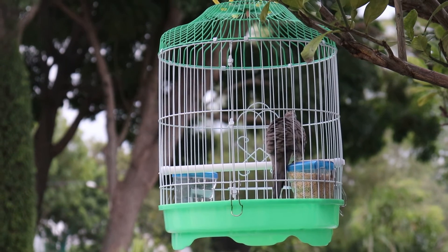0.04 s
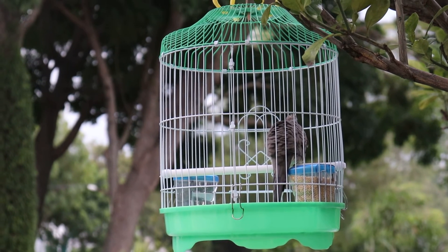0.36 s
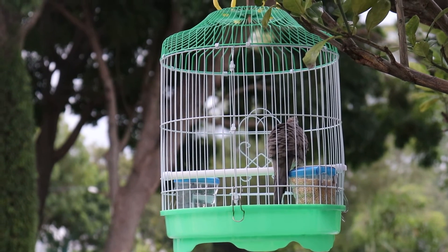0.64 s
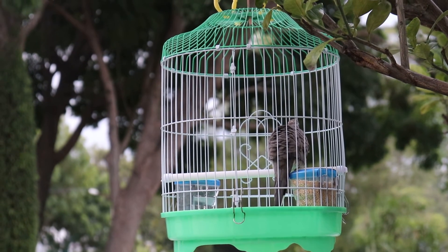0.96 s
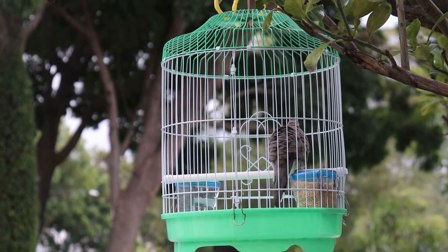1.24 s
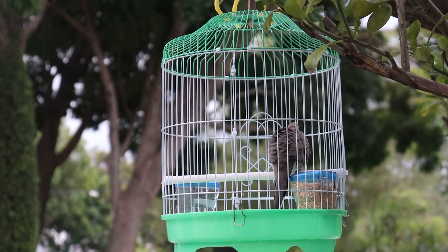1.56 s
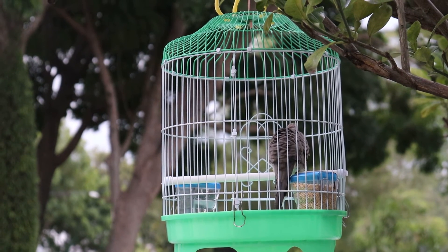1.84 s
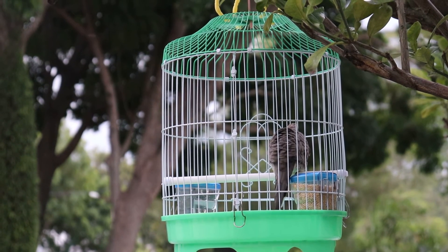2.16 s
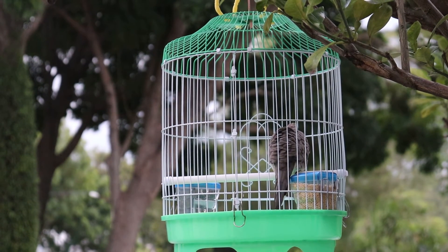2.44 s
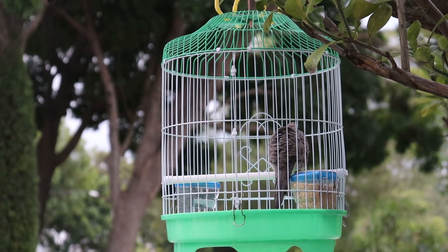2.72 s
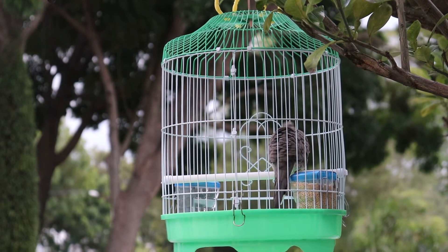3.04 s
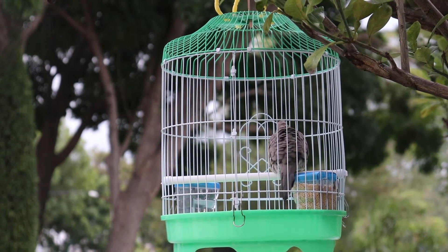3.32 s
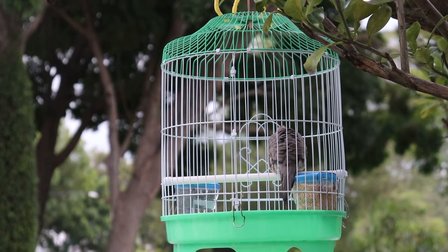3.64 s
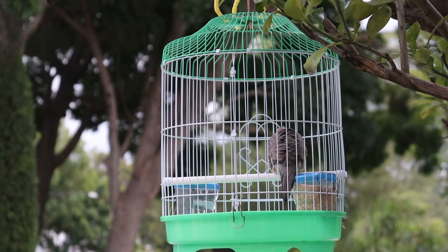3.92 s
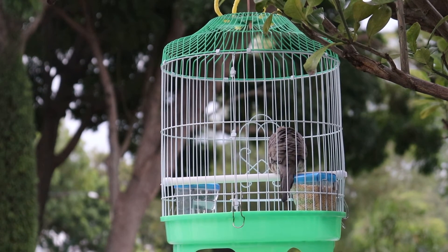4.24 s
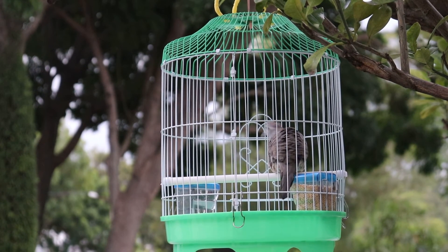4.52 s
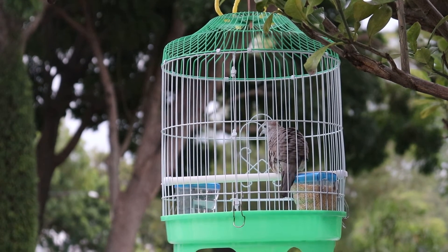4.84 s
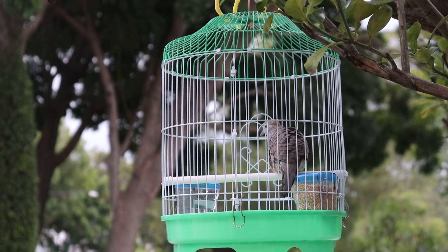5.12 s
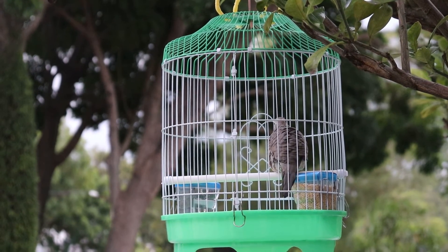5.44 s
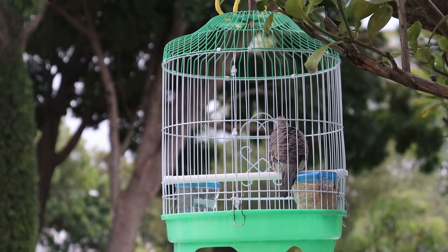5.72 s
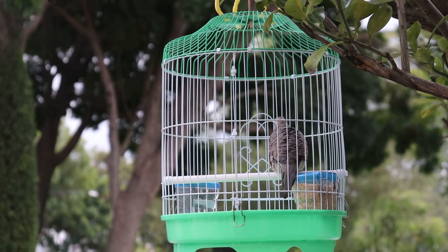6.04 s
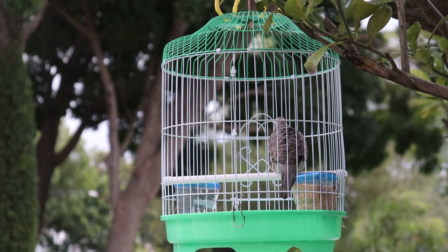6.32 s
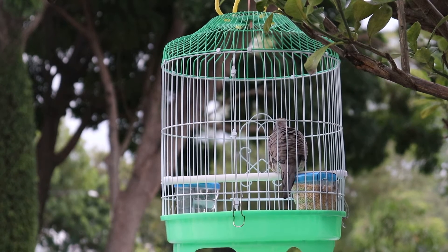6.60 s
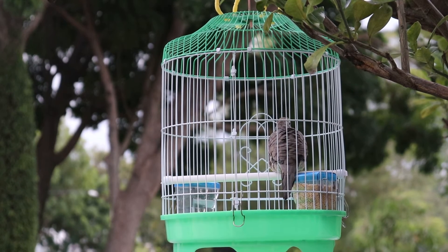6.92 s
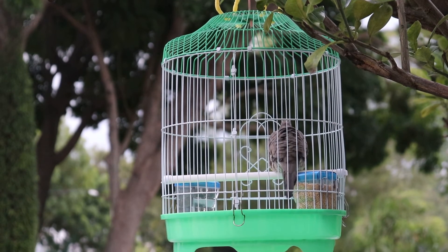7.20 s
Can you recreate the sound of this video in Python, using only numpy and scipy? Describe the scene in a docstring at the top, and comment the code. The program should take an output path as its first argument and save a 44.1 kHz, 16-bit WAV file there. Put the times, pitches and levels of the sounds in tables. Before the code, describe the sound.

A caged dove sings close to the microphone in a garden, slightly right of centre. From the start to about 2.3 seconds it gives clear staccato coos, each opened by a tiny throat catch, quickest and loudest around 1.6 seconds. A shorter run follows from 3.5 to 4.3 seconds, and a single coo at 7.3. A second dove, just left of centre, answers at about 0.5, 3.2 and 6 seconds, each time with two hoots and a rolling growl that falls away. Both echo lightly off walls and trees. Something bangs shut dully in the distance at 2.2 seconds. Far left, a bird gives raspy calls from 3.2 seconds, ending in a clean rising whistle around 4.4. Faint high coos come from further off near 0.9, 3.4 and 6.1 seconds. A low town rumble, soft airy hiss and faint machine hum continue throughout.

```python
"""A caged dove, close to a stereo pair in a garden, sings clear staccato coos, each opened by a catch
of the throat. A second dove, a little left of centre, answers with two hoots and a rolling growl.
Nearby walls echo both; trunks and leaves scatter the sound. Further off are faint high coos, and far
to the left a bird calls and whistles among the trees. Something bangs shut in the distance, and a
machine hums under the town's rumble."""
import sys
import numpy as np
from scipy import signal
from scipy.fft import irfft
from scipy.io import wavfile
from scipy.ndimage import uniform_filter1d

SR = 44100
rng = np.random.default_rng(int(sys.argv[2]) if len(sys.argv) > 2 else 0)


def to_wav(s):
    """Save 16-bit WAV."""
    ch = np.atleast_2d(s).T  # columns
    pcm = np.round(np.clip(ch, -1, 1) * 32767)  # PCM
    wavfile.write(sys.argv[1], SR, pcm.astype(np.int16))


N = 324576

# how alike diffuse sound is at the two microphones: f/Hz, coherence 0-1
MIC_COHERENCE = [(100, .99), (250, 0.95), (500, 0.71), (1000, 0.39), (2000, .2), (4000, 0.068),
                 (12000, 0.081)]
# the second dove's phrases: t/s, top pitch of the hoots/Hz, hoot level/dB, growl level/dB
ANSWERS = [(.45, 729.4, -24.5, -23), (3.193, 780.7, -21.5, -23.5), (6.013, 789.2, -21, -23.5)]
# the caged dove's notes, and a faint echo of one at 2.3 s:
# t/s, length/s, top pitch/Hz, level/dB, level of the opening catch/dB
COOS = [ (-.055, 0.217, 914.3, -20.5, -30), (0.276, 0.229, 904, -22, -35), (.618, 0.218, 896.5, -21.5, -35),
        (.972, 0.19, 885, -21.5, -27.5), (1.521, 0.12, 941, -16, -30), (1.632, 0.054, 941.6, -13.5, -40),
        (1.728, 0.045, 936, -18, -37), (1.846, .19, 898, -20.5, -33), (2.163, .148, 870, -30, -31),
        (2.3, 0.077, 875, -34.5, -55), (3.55, 0.15, 938, -13.5, -29), (3.716, 0.033, 938.5, -13, -45),
        (3.803, 0.039, 913, -18.5, -37), (3.902, 0.15, 895, -18.5, -41.5), (4.199, 0.11, 872, -28.5, -32),
        (7.346, .2, 865, -21, -28.5), ]


def gain_of(db):
    """Decibels to a factor."""
    return 10 ** (np.asarray(db) / 20)


def unit_rms(x):
    """Scales to an rms of 1."""
    return x / np.sqrt(np.mean(x ** 2) + 1e-20)


def value_at(points, hz):
    """Interpolates a table on a log-frequency axis."""
    f, value = np.transpose(points)
    return np.interp(np.log(hz + 1), np.log(f + 1), value)


def curves(rows):
    """Sample times of a table, then each column joined by straight lines."""
    s, *columns = np.transpose(rows)
    t = np.arange(s[0], s[-1], 1 / SR)
    return [t] + [np.interp(t, s, c) for c in columns]


def add(mix, s, sound):
    """Lays a sound into the mix at time s, which may lie before the start."""
    at = round(s * SR)
    part, sound = mix[max(at, 0):], sound[max(-at, 0):]
    part[:len(sound)] += sound[:len(part)]


def wander(size, hz):
    """Smooth random drift, rms about 1, that moves up to about hz times a second."""
    f = np.fft.rfftfreq(2 ** 19 if size > SR else 2 ** 16, 1 / SR)
    spectrum = rng.standard_normal(len(f)) + 1j * rng.standard_normal(len(f))
    return unit_rms(irfft(spectrum * np.exp(-(f / hz) ** 2)))[:size]


def fade(t, seconds):
    """Soft start and end of a note."""
    return np.sin(np.pi / 2 * np.clip(np.minimum(t - t[0], t[-1] - t) / seconds, 0, 1)) ** 2


def swell(t, attack_s, release_s):
    """Attack, hold and release; a short note peaks where the two ramps meet."""
    ramps = np.clip(np.minimum(t / attack_s, (t[-1] - t) / release_s), 0, 1)
    return np.sin(np.pi / 2 * ramps / ramps.max())


def tone(hz, harmonics=((1, 0),)):
    """Harmonics (multiple, level/dB) on a moving pitch; a pure tone by default."""
    phase = 2 * np.pi * np.cumsum(hz) / SR
    return np.sqrt(2) * sum(gain_of(db) * np.sin(multiple * phase) for multiple, db in harmonics)


def pan(x, left_db):
    """Makes the left channel left_db louder than the right."""
    return x * gain_of(np.array([[left_db], [-left_db]]) / 2)


def late_right(x, lag_s):
    """Sound from the left reaches the right microphone later."""
    t = np.arange(N) / SR
    return np.array([x[0], np.interp(t - lag_s, t, x[1])])


def diffuse_noise(colour, patchy_db):
    """Coloured noise of rms 1 that swells in patches; the bass is alike at both microphones."""
    frames, hz = N // 512 + 5, np.fft.rfftfreq(2048, 1 / SR)
    a, b, c, d, patches = rng.standard_normal((5, frames, len(hz)))
    patches = uniform_filter1d(patches, size=16, axis=0)
    patches = unit_rms(uniform_filter1d(patches, size=30, axis=1))
    coherence, left = value_at(MIC_COHERENCE, hz), a + 1j * b
    right = coherence * left + np.sqrt(1 - coherence ** 2) * (c + 1j * d)
    bands = np.array([left, right]) * gain_of(value_at(colour, hz) + patchy_db * patches)
    return unit_rms(signal.istft(bands.swapaxes(1, 2), nperseg=2048, noverlap=1536)[1][:, :N])


def garden(x):
    """Diffuse scatter from trunks and leaves, each band dying at its own speed."""
    # reverberation time: f/Hz, t60/s
    decay_times = [(100, 0.2), (800, 0.58), (2500, 1.5), (5000, 1.09), (10000, 0.88), (15000, .5)]
    hz, t, bands = signal.stft(rng.standard_normal((2, SR)), SR, nperseg=256)
    coherence = value_at(MIC_COHERENCE, hz)[:, None]
    bands[1] = coherence * bands[0] + np.sqrt(1 - coherence ** 2) * bands[1]
    decay = gain_of(-60 * t / value_at(decay_times, hz)[:, None])
    tail = signal.istft(bands * decay, SR, nperseg=256)[1]
    return signal.fftconvolve(x[None], tail / np.linalg.norm(tail[0]), axes=1)[:, :N]


def walls(x, echoes):
    """The direct sound with single echoes from the ground and nearby walls."""
    out = np.array([x, x])
    for left_s, right_s, db in echoes:
        add(out[0], left_s, gain_of(db) * x)
        add(out[1], right_s, gain_of(db) * x)
    return out


def microphone_hiss():
    """The microphones' own thin hiss."""
    # two high bands of hiss: f/Hz, level/dB
    hiss = [(6400, -20), (7150, -6), (7550, -1), (8200, -14), (8700, -9.5), (9300, 1), (9900, -10.5),
            (11000, -32)]
    return gain_of(-57.5) * diffuse_noise(hiss, patchy_db=2.3)


def town_ambience():
    """Town rumble and open air."""
    # spectrum of the town's rumble: f/Hz, level/dB
    rumble = [(15, -36), (25, -16), (45, -5.5), (75, 2.5), (115, 0), (150, -2.5), (190, -3.5), (240, -9),
              (330, -10), (520, -16), (900, -46.5)]
    # spectrum of the open air: f/Hz, level/dB
    air = [(300, -8), (600, 0), (1000, 0), (1300, 0), (1700, -3.5), (2300, -7), (2900, -5), (4000, -7),
           (4800, -12.5), (5700, -19), (8400, -22), (10500, -21.5), (12000, -29), (15500, -35.5)]
    return (gain_of(-43.5) * diffuse_noise(rumble, patchy_db=0.4)
            + gain_of(-45) * diffuse_noise(air, patchy_db=0.84))


def machine(drift=0.00401, throb=0.089):
    """A far motor: steady tones that waver in pitch and strength."""
    # tones of the hum: f/Hz, level/dB
    hum = [(188.4, -46.5), (969.0, -63), (1260, -60.5), (1480, -64), (1825, -77.5), (2912, -64.5)]
    out = np.zeros(N)
    for hz, db in hum:
        strength = 1 + throb * wander(N, 13)
        out += gain_of(db) * strength * tone(hz * (1 + drift * wander(N, 5.3)))
    return out


def bang(ring_s=0.051, tail_s=0.13, tail_db=-12):
    """Something shuts far off: a dull blow with a sharp edge, two rebounds and a short tail."""
    # the blow and its rebounds: t/s, level/dB
    blows = [(2.233, -30.5), (2.26, -37), (2.279, -39)]
    # spectrum of the bang: f/Hz, level/dB
    colour = [(25, -9), (55, 0), (170, -1), (250, -7), (335, -2), (450, -17), (1500, -24), (3200, -19),
              (5500, -25), (9000, -39), (15000, -55)]
    power = np.zeros(N)
    t = np.arange(SR) / SR
    decay = np.exp(-2 * t / ring_s) + gain_of(2 * tail_db) * np.exp(-2 * t / tail_s)
    for s, db in blows:
        add(power, s, gain_of(2 * db) * decay * fade(t, 0.0036))
    return np.sqrt(power) * diffuse_noise(colour, patchy_db=1)


def far_coos(sag=0.015):
    """Thin, high coos further off, each sinking a little."""
    # faint coos: t/s, length/s, f/Hz, level/dB
    notes = [(0.878, 0.041, 1075, -29), (3.369, 0.048, 1075, -35.5), (3.421, 0.12, 1055, -46.5),
             (6.139, 0.11, 1078, -42)]
    out = np.zeros(N)
    for s, length, hz, db in notes:
        t = np.arange(0, length, 1 / SR)
        sinking = 1 - sag * (t / length - .5)
        add(out, s, gain_of(db) * fade(t, 0.031) * tone(hz * sinking))
    return out


def far_bird(rasp_hz=260, slur_share=.35):
    """Raspy calls from the trees, then a clean rising whistle; each note slurs and levels off."""
    # calls: t/s, length/s, opening pitch/Hz, final pitch/Hz, level/dB, rasp as a share of the pitch
    calls = [ (0, 0.27, 5210, 5200, -64.5, 0.049), (3.17, 0.084, 3260, 3430, -44, 0.025),
             (3.235, 0.079, 3410, 3492, -38, 0.015), (3.51, .15, 2676, 2920, -47, 0.063),
             (3.595, 0.091, 3490, 3545, -38.5, 0.0076), (4.06, 0.152, 2855, 3000, -51, 0.025),
             (4.185, 0.12, 3070, 3500, -42, .038), (4.22, 0.14, 3109, 3130, -50, 0.0057), ]
    # the whistle's soft lead-in, upward slur and faint end: columns as for the calls
    whistle = [(4.24, .075, 4670, 4700, -49, .002), (4.298, 0.091, 4620, 4990, -35, .003),
               (4.385, 0.108, 5014, 5050, -30, 0.0041), (4.51, 0.118, 4982, 5085, -38, 0.0039)]
    # harmonics of a call: multiple, level/dB
    call_harmonics = [(1, 2.5), (2, -8), (3, -21), (4, -40)]
    # harmonics of the whistle: multiple, level/dB
    whistle_harmonics = [(1, -2), (2, -27.5), (3, -43)]
    out = np.zeros(N)
    for notes, harmonics in (calls, call_harmonics), (whistle, whistle_harmonics):
        for s, length, from_hz, to_hz, db, rasp in notes:
            t = np.arange(0, length, 1 / SR)
            hz = to_hz + (from_hz - to_hz) * np.exp(-t / (slur_share * length))
            hz *= 1 + rasp * wander(len(t), rasp_hz)
            add(out, s, gain_of(db) * swell(t, attack_s=0.011, release_s=0.023) * tone(hz, harmonics))
    return out


def pulsing(size, rate_hz, depth, unevenness):
    """An uneven pulsing: the growl's trill, and the ripple of overlapping echoes on the hoots."""
    beat = 2 * np.pi * np.cumsum(rate_hz * (1 + unevenness * wander(size, 50.2))) / SR
    return np.sin(beat), 1 + depth * np.cos(beat)  # a swing, and a strength that peaks on each upsweep


def hoots(ripple_hz=58, pitch_swing=0.0048, jitter=0.0062):
    """The second dove opens each phrase with two arched hoots; a ripple stands for overlapping echoes."""
    # the quick hoot: t/s into the phrase, factor on the top pitch, level/dB
    quick_hoot = [(0, .74, -10), (0.027, .93, -10), (.037, 0.98, -1.5), (0.058, .99, -3), (0.085, .86, -3),
                  (.1, 0.762, -11.5), (.114, 0.57, -21)]
    # the slow hoot, which swells again as its pitch breaks: same columns
    slow_hoot = [(.155, .66, -14), (.195, .85, -7), (0.23, .97, 3.5), (0.259, 1, -3.5), (0.289, .99, -6),
                 (.303, .92, 1), (.325, 0.693, -14.5)]
    out = np.zeros(N)
    for s, top_hz, level_db, _ in ANSWERS:
        for shape in quick_hoot, slow_hoot:
            t, arch, db = curves(shape)
            swing, strength = pulsing(len(t), ripple_hz, depth=0.51, unevenness=.15)
            hz = top_hz * arch * (1 + pitch_swing * swing + jitter * wander(len(t), 150))
            add(out, s + t[0], gain_of(level_db + db) * fade(t, 0.0019) * strength * tone(hz))
    return out


def growls(trill_hz=59, pitch_swing=0.13, rough=0.022, grain=0.11):
    """The second dove ends each phrase on a fast, wide trill that dies away as the note falls."""
    # course of the growl: t/s into the phrase, f/Hz, level/dB, amount of trill 0-1
    course = [(.475, 795.3, -5, .95), (.59, 823.6, -2.5, 0.8), (.705, 800, -1.5, 1), (.765, 775, 0, 0.69),
              (.825, 703.6, 0, 0.52), (.875, 625, -6.5, .2), (.925, 519, -19, 0)]
    out = np.zeros(N)
    t, course_hz, db, trill = curves(course)
    for s, _, _, level_db in ANSWERS:
        swing, strength = pulsing(len(t), trill_hz, depth=0.15 * trill, unevenness=.27)
        hz = course_hz * (1 + trill * (pitch_swing * swing + rough * wander(len(t), 200)))
        strength *= 1 + grain * trill * wander(len(t), 100)
        add(out, s + t[0], gain_of(level_db + db) * fade(t, .008) * strength * tone(hz))
    return out


def throat_catches(hz=1050, lead_s=0.00384, half_width_s=.0052, glide=.06, rough=.1, shimmer=0.33):
    """The caged dove's throat catches just before each note: a brief, unsteady cluck slipping upward."""
    out = np.zeros(N)
    u = np.arange(-3, 3, 1 / (half_width_s * SR))  # time from the cluck's centre, in half-widths
    for s, _, _, _, db in COOS:
        pitch = hz * np.exp(glide * u + rough * wander(len(u), 300))
        envelope = np.exp(-abs(u) ** 3 / 4) * (1 + shimmer * wander(len(u), 240))
        add(out, s - lead_s + u[0] * half_width_s, gain_of(db) * envelope * tone(pitch))
    return out


def caged_dove(scoop=0.2055, scoop_s=0.00787, jitter=0.0035, sag_db_per_s=12, round_above_db=-21):
    """Close, nearly pure notes that scoop up and arch; the louder the note, the rounder its tone."""
    # harmonics of the dove's voice: multiple, level/dB
    harmonics = [(1, 0), (2, -37), (3, -36), (4, -42), (5, -47), (6, -49), (7, -49), (8, -52)]
    # the arch of every note: share of its length, factor on the top pitch
    pitch_arch = [(0, .97), (.2, .993), (.35, 1), (.65, .985), (1, .968)]
    out = np.zeros(N)
    for s, length, top_hz, level_db, _ in COOS:
        t = np.arange(0, length, 1 / SR)
        db = level_db - sag_db_per_s * t
        arch = np.interp(np.linspace(0, 1, len(t)), *np.transpose(pitch_arch))
        rise = 1 - scoop * np.exp(-t / scoop_s)
        hz = top_hz * arch * rise * (1 + jitter * wander(len(t), 120))
        overtones = tone(hz, harmonics[1:]) * gain_of(-np.maximum(db - round_above_db, 0))
        add(out, s, gain_of(db) * swell(t, attack_s=0.051, release_s=0.022) * (tone(hz) + overtones))
    return out


def scene():
    """The garden from the microphones: the caged dove close and driest, the far bird mostly scatter."""
    # echoes of the caged dove: left delay/s, right delay/s, level/dB
    cage_echoes = [(.0165, 0.015, -20.5), (.043, .0425, -22), (.082, 0.094, -26.5), (.108, 0.15, -26)]
    # echoes of the second dove from walls near it: same columns
    answer_echoes = [(.0140, 0.01145, -7.5), (.02665, .02335, -4.5), (.038, .0415, -17.5),
                     (.05365, .0537, -13.5), (.102, 0.12, -20.5)]
    caged = caged_dove() + throat_catches()
    second = hoots() + growls()
    bird, coos = far_bird(), far_coos()
    out = pan(walls(caged, cage_echoes), left_db=-5) + gain_of(-8) * garden(caged)
    answer = pan(gain_of(-1.5) * walls(second, answer_echoes), left_db=-0.5)
    out += late_right(answer + gain_of(-6.5) * garden(second), lag_s=0.00029)
    out += pan(gain_of(-7.5) * bird, left_db=7) + gain_of(-2) * garden(bird)
    out += gain_of(-3) * coos + gain_of(-9) * garden(coos)
    return out + town_ambience() + microphone_hiss() + gain_of(-.5) * machine() + bang()


def record(dry):
    """The recorder's band limit."""
    lowpass = signal.firwin(511, cutoff=15720, window=("kaiser", 9), fs=SR)
    return signal.oaconvolve(dry, lowpass[None], "same")


dry = scene()
out = record(dry)
to_wav(out)
```